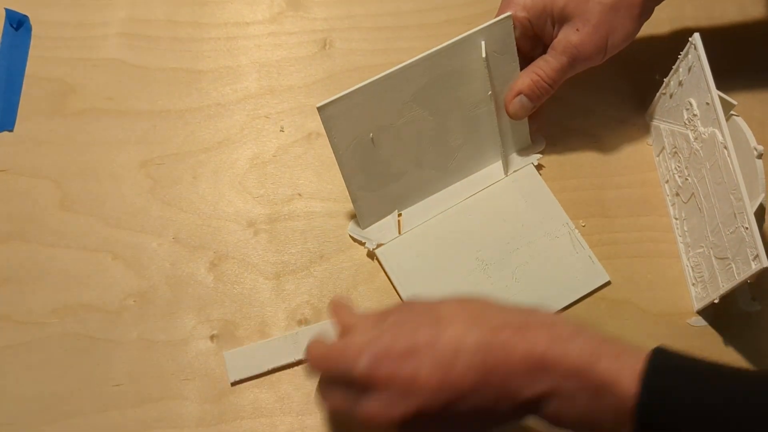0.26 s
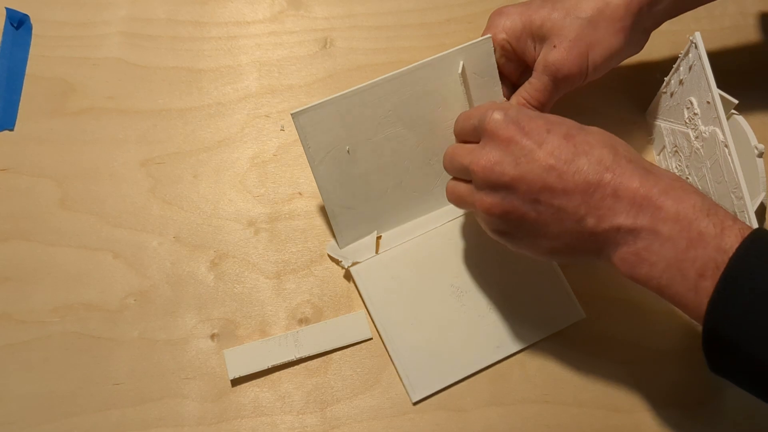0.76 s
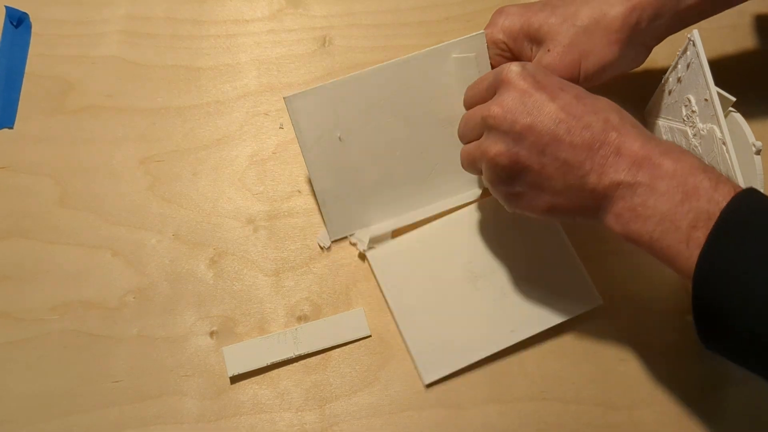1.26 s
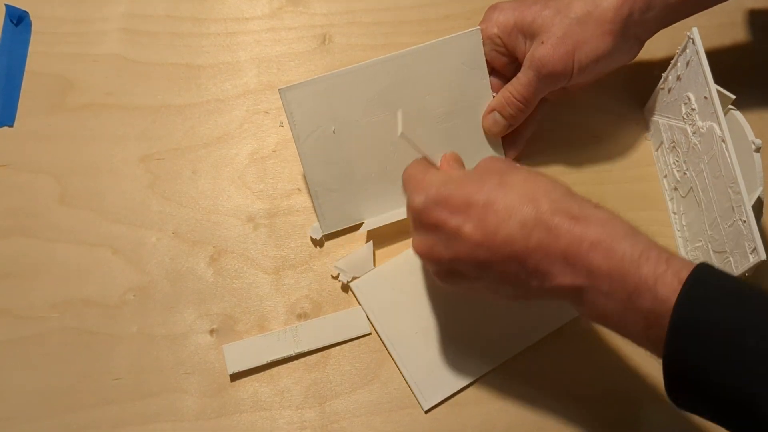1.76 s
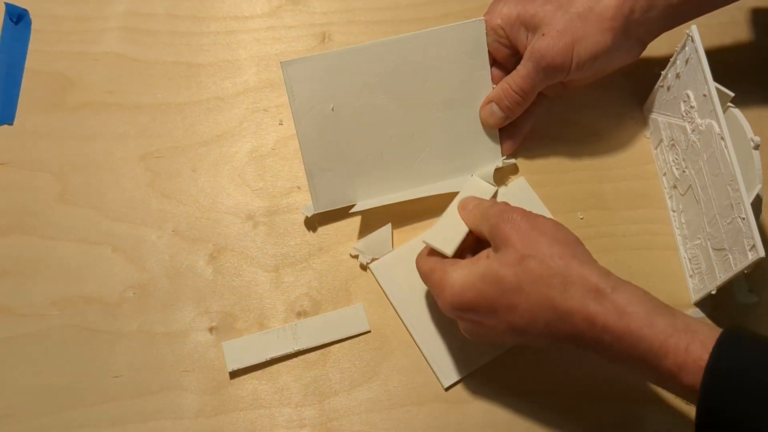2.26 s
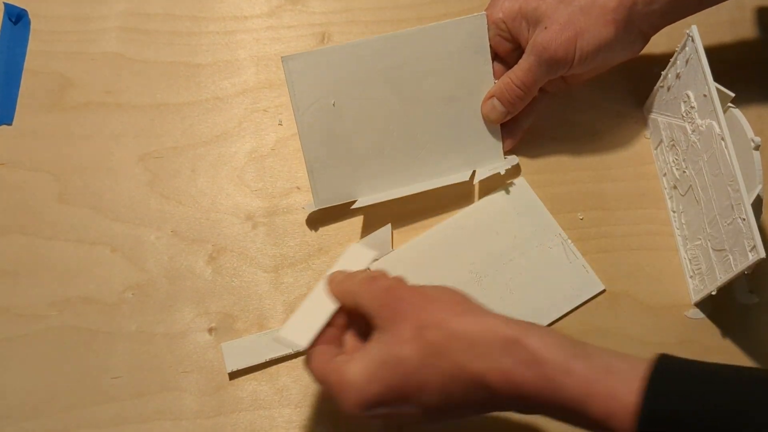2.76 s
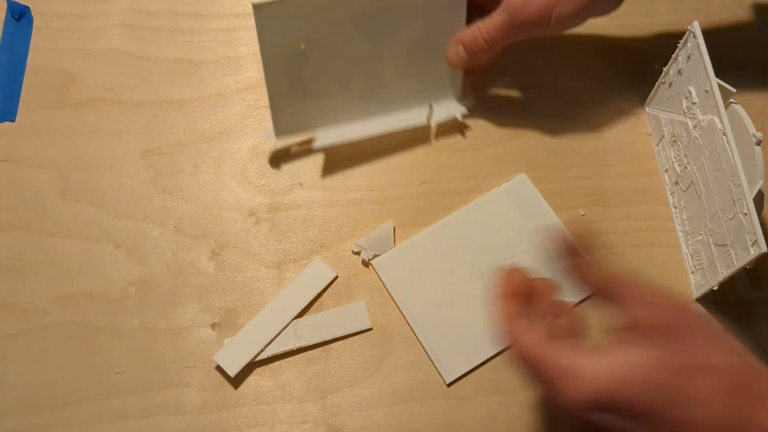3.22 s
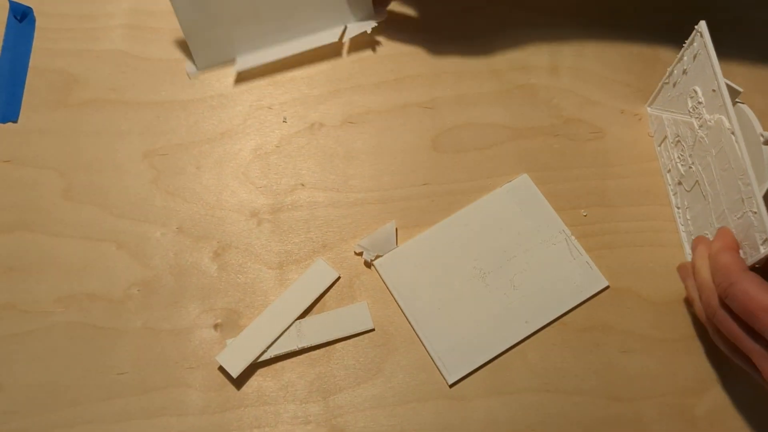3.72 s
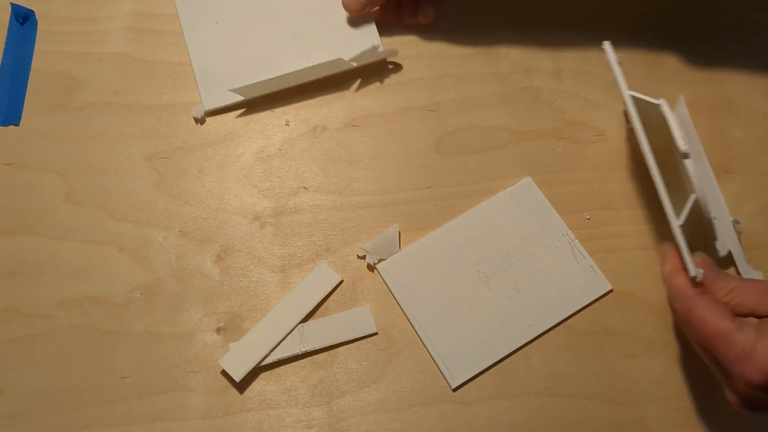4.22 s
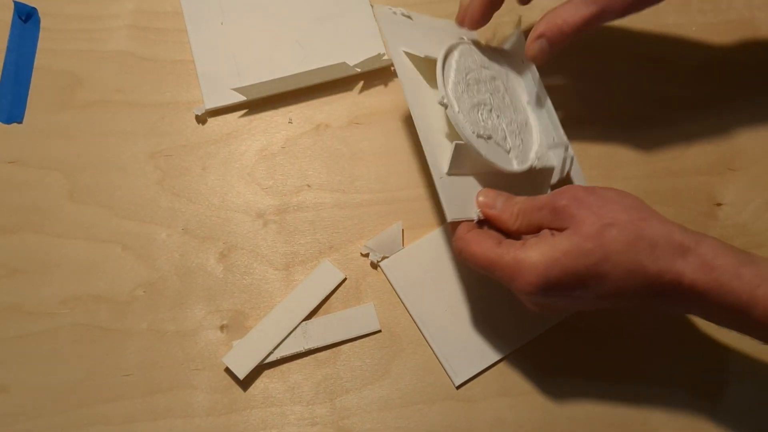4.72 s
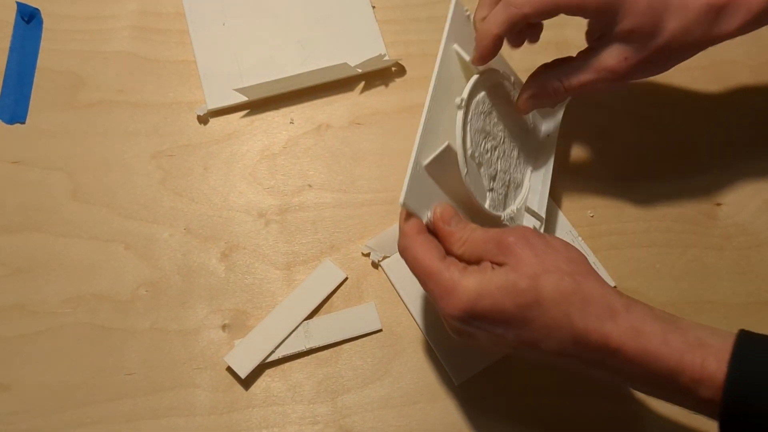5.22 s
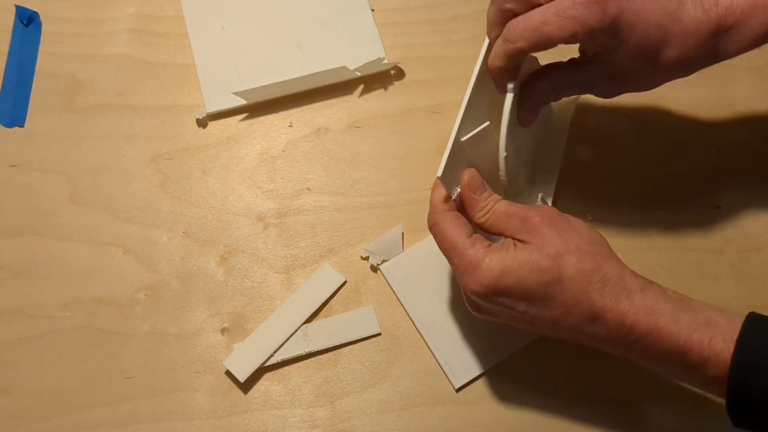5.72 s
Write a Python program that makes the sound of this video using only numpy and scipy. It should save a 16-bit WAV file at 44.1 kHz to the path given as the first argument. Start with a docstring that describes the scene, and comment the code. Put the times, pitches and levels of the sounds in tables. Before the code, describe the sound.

Thin plastic support bars tick and snap off a printed plate with a sharp cracking burst, then pieces clatter, knock and judder on a wooden table.

```python
"""Hands break plastic support bars off printed parts on a wooden table in a small room.
First a loose bar ticks; light blows fall on a plate, then it tears from its base in a run of cracks and clatters;
another bar is pried away and laid down; a dull knock on the table follows; last, a ribbed housing is lifted,
turned, and judders. Blows are noise bursts over damped modes, scrapes and rubbing fingers are random clicks shaped
by spectra, and low noise rumbles and booms as the arms lean on and shove the table, most of it in the first half."""
import sys
import numpy as np
from scipy import signal
from scipy.fft import rfft, irfft, next_fast_len
from scipy.io import wavfile
from scipy.ndimage import uniform_filter1d

SR = 44100
rng = np.random.default_rng(int(sys.argv[2]) if len(sys.argv) > 2 else 0)


def transcribe(signal):
    """Save signal, clipped to [-1, 1], as a 16-bit WAV file at the path in sys.argv[1]."""
    frames = np.atleast_2d(signal).T
    limited = np.clip(frames, -1, 1)
    pcm = np.round(limited * 32767).astype(np.int16)
    wavfile.write(sys.argv[1], SR, pcm)


N = 263718  # length in samples

# Modes each part rings with: (frequency [Hz], relative level [dB], decay by 60 dB [s])
PLATE_MODES = [(862, -13, 0.24), (1130, -10, 0.083), (1260, -12, 0.054), (1536, -4, 0.078),
               (1816, 2, 0.036), (2095, 0.5, 0.098), (2111, -6.5, 0.11), (2497, -2, 0.066),
               (2670, -11, 0.031)]
BAR_MODES = [(906, -4, 0.07), (1131, -4, 0.054), (1988, -3.5, 0.088), (2124, 5.5, 0.023), (2464, -5, 0.11),
             (2732, -8.5, 0.13), (3116, -2.5, 0.099), (3760, -12, 0.14), (4450, -16, .08)]
HOUSING_MODES = [(892, -9, 0.097), (1137, -7, 0.12), (1355, -6, 0.14), (1693, -0.5, 0.07),
                 (1793, -4.5, 0.069), (2461, 5, 0.058), (2577, -2, 0.058), (2800, -3, 0.046),
                 (3028, -7, 0.061), (3320, -5, 0.062), (3950, -5.5, .05), (5560, -11, 0.045)]
# Stick and slip of a stroke: (frequency [Hz], relative level [dB])
RASP = [(100, -30), (350, -18.5), (650, -19.5), (850, -6), (1400, -1), (2200, -1), (2800, -5), (3500, -7),
        (5000, -14), (7000, -25)]
# Skin and edges on the print's ridges: (frequency [Hz], relative level [dB])
FIZZ = [(3500, -30.5), (5000, -8), (7000, -2.5), (9000, -6), (12000, -1.5), (14000, -9), (16000, -11)]


def amp(db):
    """Decibels to gain."""
    return 10 ** (np.asarray(db) / 20)


def read(points, hz):
    """A table's value on a log-frequency axis."""
    f, value = np.transpose(points)
    return np.interp(np.log(hz + 1), np.log(f + 1), value)


def evened(x):
    """Scales to an rms of one."""
    return x / np.sqrt(np.mean(x ** 2) + 1e-20)


def peaked(x, size=130):
    """Scales so that the loudest three milliseconds have an rms of one."""
    power = uniform_filter1d((x ** 2).mean(0), size, mode="constant")
    return x / np.sqrt(power.max() + 1e-20)


def add(mix, s, sound):
    """Mixes a sound in at time s."""
    part = mix[:, max(round(s * SR), 0):][:, :sound.shape[1]]
    part += sound[:, :part.shape[1]]


def paired(z, hz):
    """Two unrelated spectra become a microphone pair, alike in the bass."""
    # Likeness of the two channels: (frequency [Hz], left-right correlation [-1 to 1])
    likeness = [(100, .99), (350, .96), (800, .72), (2000, .68), (4000, .42), (12000, .3)]
    same = np.clip(read(likeness, hz), -1, 1)
    mid = z[0] * np.sqrt((1 + same) / 2)
    side = z[1] * np.sqrt((1 - same) / 2)
    return np.array([mid + side, mid - side])


def favoured(hz, centre_hz, lift_db=6, octaves=0.31):
    """The spot of contact lifts the modes near one frequency, in dB; less so among the crowded treble modes."""
    distance = np.log2((hz + 1) / centre_hz) / octaves
    return lift_db / (1 + (centre_hz / 9000) ** 2) * np.exp(-distance ** 2)


def coloured(x, spectrum, centre_hz=None):
    """Gives two noise channels a spectrum, with a favoured frequency if there is one; rms one."""
    size = next_fast_len(x.shape[1])
    hz = np.fft.rfftfreq(size, 1 / SR)
    skirt = 1 / (1 + (hz / spectrum[-1][0] / 2) ** 4)  # fades out above the table's last frequency
    db = read(spectrum, hz) + (favoured(hz, centre_hz) if centre_hz else 0)
    shaped = paired(rfft(x, size), hz) * amp(db) * skirt
    return evened(irfft(shaped, size)[:, :x.shape[1]])


def noise(spectrum, size, centre_hz=None):
    """Smooth stereo noise of a given spectrum."""
    return coloured(rng.standard_normal((2, size)), spectrum, centre_hz)


def grit(spectrum, size, per_s, spread_db, centre_hz=None, smooth=0.18):
    """Tiny slips and fractures along the print's ridges: random clicks of uneven strength over faint noise."""
    strength = amp(spread_db * np.minimum(rng.exponential(1, size), 4))
    slips = (rng.random(size) < per_s / SR) * strength
    return coloured((slips + smooth) * rng.standard_normal((2, size)), spectrum, centre_hz)


def burst(t, rise, fall):
    """A burst's envelope: short rise, then exponential decay."""
    return (1 - np.exp(-t / rise)) * np.exp(-t / max(fall, .0007))


def ring(modes, centre_hz, size=5120):
    """Damped modes; every blow lands on another spot and weights them anew."""
    t = np.arange(size) / SR
    hz, db, t60 = np.transpose(modes)[:, :, None]
    weight, detune, turn, aside = rng.standard_normal((4, len(modes), 1))
    phase = 2 * np.pi * (hz * (1 + 0.001 * detune) * t + turn)
    height = amp(db + 1.1 * weight + favoured(hz, centre_hz)) * np.exp(-np.log(1000) * t / t60)
    # opposite phase shifts spread each mode between left and right
    pair = [(height * np.sin(phase + way * 0.48 * aside)).sum(0) for way in (-1, 1)]
    return np.array(pair) * (1 - np.exp(-t / 0.00042))


def from_the_left(x, count=2):
    """The sound reaches the right port a few samples after the left."""
    return np.array([x[0], np.pad(x[1], (count, 0))[:N]])


def still_room():
    """The steady, faint noise of the room at rest."""
    # Noise floor: (frequency [Hz], relative level [dB])
    floor = [(15, -42), (25, -4.5), (123, 6.5), (249, -7), (610, -17), (765, 2.5), (988, -19.5), (1130, -2),
             (1560, -12), (2050, -10.5), (4610, -16), (5570, -24.5), (11300, -22.5), (12900, -26.5),
             (16000, -48.5)]
    return amp(-70) * noise(floor, N)


def room(x, build=0.0033):
    """Reflections of a small hard room, fed by the left channel, each band dying at its own speed."""
    # Reverberation: (frequency [Hz], decay by 60 dB [s])
    room_t60 = [(120, 0.22), (500, 0.67), (1000, 0.39), (2000, 0.62), (4000, 0.44), (8000, 0.33),
                (15000, 0.4)]
    # Colour of the reflections: (frequency [Hz], level before the walls' overall gain [dB])
    room_db = [(120, -3), (500, -1.5), (1000, -4), (2000, -12), (5000, -6), (14000, -15)]
    hz, t, z = signal.stft(rng.standard_normal((2, SR)), SR, nperseg=256)
    fall = np.log(1000) / np.maximum(read(room_t60, hz), .05)[:, None]
    z = z * np.exp(-fall * t) * np.sqrt(2 * fall / SR) * amp(read(room_db, hz))[:, None]
    tail = signal.istft(z, SR, nperseg=256)[1][:, :SR]
    tail = irfft(paired(rfft(tail), np.fft.rfftfreq(SR, 1 / SR)), SR)
    tail *= 1 - np.exp(-np.arange(SR) / SR / build)
    return signal.fftconvolve(x[:1], tail, axes=1)[:, :N]


def rumble():
    """The table top rumbles under resting arms and booms briefly at each shove."""
    # An arm shoves the table top: (time [s], deep level [dB], boom level [dB])
    shoves = [(0.0, -53.5, -46.5), (2.13, -57.5, -49.5), (2.29, -59.5, -65.5), (2.441, -63, -68),
              (2.6, -62.5, -70), (5.67, -69, -66.5)]
    # Slow give of the table: (frequency [Hz], relative level [dB])
    deep_spectrum = [(20, -13.5), (35, -4.5), (52, 23), (90, -35), (150, -15), (400, -45.5), (1000, -79)]
    # Boom of the table top: (frequency [Hz], relative level [dB])
    boom_spectrum = [(60, -41), (130, 3.5), (220, -6), (340, -9), (480, -20.5), (900, -42), (2000, -70.5)]
    rise_s, deep_fall_s, boom_fall_s = 0.038, .13, 0.071
    lean_until_s, lean_db = 2.7, -76  # the arms rest on the table until then
    clock = np.arange(N) / SR
    deep = amp(lean_db) * np.exp(-np.maximum(clock - lean_until_s, 0) / deep_fall_s)
    boom = 0
    for s, deep_db, boom_db in shoves:
        t = np.maximum(clock - s, 0)
        push = np.minimum(t / rise_s, 1)
        after = np.maximum(t - rise_s, 0)
        deep = np.hypot(deep, amp(deep_db) * push * np.exp(-after / deep_fall_s))
        boom = np.hypot(boom, amp(boom_db) * push * np.exp(-after / boom_fall_s))
    return deep * noise(deep_spectrum, N) + boom * noise(boom_spectrum, N)


def handling(waver_db=2.5, ring_db=-3):
    """Fingers rub the parts with an unsteady grip; first the plate sings under them, later the housing."""
    # Fingers slide to a new grip: (start [s], length [s], rasp level [dB], fizz level [dB])
    rubs = [(0.129, .34, -61.5, -68), (0.568, 0.19, -65.5, -74.5), (0.946, 0.18, -68, -77),
            (1.441, .26, -62, -75.5), (1.944, 0.22, -59.5, -70.5), (2.38, .1, -54.5, -60),
            (3.645, 0.28, -60.5, -68.5), (3.998, 0.36, -65.5, -71), (4.85, 0.11, -59.5, -71),
            (5.387, .16, -62, -82), (5.7, 0.31, -70.5, -89)]
    grip_s, let_go_s = 0.037, 0.055  # swell and decay of a rub
    t = np.arange(N) / SR
    rasp, fizz = amp(-80), amp(-85.5)  # fingers merely holding a part
    for s, length, rasp_db, fizz_db in rubs:
        slide = np.clip((t - s) / grip_s, 0, 1) * np.exp(-np.maximum(t - s - length, 0) / let_go_s)
        rasp = rasp + amp(rasp_db) * slide
        fizz = fizz + amp(fizz_db) * slide
    slow = uniform_filter1d(uniform_filter1d(rng.standard_normal(N), size=700), size=300)
    grip_db = waver_db * evened(slow)
    slips = grit(RASP, N, 800, 1.9)
    plate = evened(signal.oaconvolve(slips, ring(PLATE_MODES, 1700), axes=1)[:, :N])
    housing = evened(signal.oaconvolve(slips, ring(HOUSING_MODES, 1250), axes=1)[:, :N])
    sung = np.where(t < 3.5, plate, housing)
    rubbed = rasp * evened(slips + amp(ring_db) * sung)
    return amp(grip_db) * (rubbed + fizz * grit(FIZZ, N, 3000, 1.4))


def in_hand(s):
    """The modes of the part being worked at time s."""
    if s < 1.9:
        return PLATE_MODES
    return BAR_MODES if s < 3.5 else HOUSING_MODES


def scrapes(ring_db=-1, size=4096):
    """Short strokes of stick and slip that bite quickly, ease off and set the part ringing."""
    # Plastic on plastic or wood:
    # (start [s], length [s], rasp level [dB], favoured frequency [Hz], fizz level [dB])
    strokes = [(0.455, 0.092, -55, 1850, -75), (0.705, 0.038, -53.5, 1900, -74),
               (.825, 0.056, -51, 1680, -75), (1.335, .04, -32.5, 1890, -49),
               (1.546, 0.047, -52.5, 2400, -69), (1.641, 0.054, -55, 2150, -85),
               (2.021, 0.084, -49.5, 2210, -69), (2.272, 0.03, -45.5, 2050, -77),
               (2.382, 0.026, -42.5, 2200, -47.5), (2.921, 0.066, -60.5, 1950, -75),
               (3.052, 0.078, -53, 1600, -70), (3.415, 0.034, -65, 1700, -84),
               (3.772, 0.036, -55, 2510, -58), (3.839, 0.09, -52, 2400, -71),
               (4.015, .05, -54.5, 1700, -61.5), (4.108, 0.018, -56.5, 2030, -64),
               (4.723, .018, -46, 2300, -57.5), (4.757, 0.069, -49.5, 2200, -64),
               (5.083, .07, -59, 2400, -79), (5.184, 0.03, -59, 2390, -67.5),
               (5.262, 0.022, -48.5, 1114, -60.5), (5.633, 0.048, -54, 2490, -66)]
    out = np.zeros((2, N))
    for s, length, rasp_db, centre_hz, fizz_db in strokes:
        progress = np.linspace(0, 1, int(abs(length) * SR) + 2)
        stroke = np.sqrt(np.abs(np.sin(np.pi * progress ** 0.78)))
        stroke = np.pad(stroke, (0, size))  # room for the ringing
        slips = stroke * grit(RASP, len(stroke), 900, 2.8)
        sung = signal.fftconvolve(slips, ring(in_hand(s), centre_hz), axes=1)[:, :len(stroke)]
        rasp = evened(evened(slips) + amp(ring_db) * evened(sung)) * slips.std()
        fizz = stroke * grit(FIZZ, len(stroke), 1800, 2.4)
        add(out, s, amp(rasp_db) * rasp + amp(fizz_db) * fizz)
    return out


def bumps(size=16384):
    """The table top gives under a part's weight and booms."""
    # A part lands: (time [s], level [dB])
    landings = [(1.295, -55.5), (3.636, -67), (4.296, -49)]
    # Boom under the weight: (frequency [Hz], relative level [dB])
    bump_spectrum = [(35, -28), (70, -11.5), (130, -2), (175, -3.5), (250, -23.5), (600, -49.5)]
    out, t = np.zeros((2, N)), np.arange(size) / SR
    for s, db in landings:
        add(out, s, amp(db) * peaked(noise(bump_spectrum, size) * burst(t, 0.0027, 0.027)))
    return out


def blows(hits, modes, body, ring_db, edge_db, thud_db, crack_hz, crack_share, size=5120):
    """Each blow clacks, rings and cracks; the edge's tick and the table's thud follow from clack and crack."""
    # A stiff edge being hit: (frequency [Hz], relative level [dB])
    edge_spectrum = [(2200, -27.5), (3200, -4.5), (3900, -0.5), (4800, -2), (5700, -9.5), (7500, -23)]
    # Brittle contact: (frequency [Hz], relative level [dB])
    crack_spectrum = [(3500, -33), (5000, -11.5), (6200, -1.5), (8000, -1), (10000, -1.5), (12000, 2.2),
                      (13500, -5), (16000, -18)]
    # Table under a blow: (frequency [Hz], relative level [dB])
    thud_spectrum = [(40, -32), (90, -14), (140, 4), (210, -7), (350, 1.5), (600, -6), (900, -13),
                     (2000, -52)]
    edge_follows = .6  # share of the crack in the tick's level; the clack gives the rest
    thud_follows = 0.72  # dB of thud for each dB of clack
    out, t = np.zeros((2, N)), np.arange(size) / SR
    for s, clack, centre_hz, crack, chatter in hits:
        dense = peaked(noise(body, size, centre_hz) * burst(t, 0.0013, chatter))
        ringing = amp(ring_db) * peaked(ring(modes, centre_hz))
        tick = peaked(noise(edge_spectrum, size) * burst(t, 0.00079, chatter))
        snap = grit(crack_spectrum, size, 3000, 2.5, crack_hz)
        snap = peaked(snap * burst(t, 0.00072, chatter * crack_share))
        thud = peaked(noise(thud_spectrum, size) * burst(t, 0.0024, .012))
        sound = amp(clack) * peaked(dense + ringing)
        sound += amp(clack + edge_follows * (crack - clack) + edge_db) * tick
        sound += amp(crack) * snap
        sound += amp(thud_follows * clack + thud_db) * thud
        add(out, s, sound)
    return out


def table_knock():
    """A dull knock sets the low, short modes of the table top ringing."""
    # (time [s], clack level [dB], favoured frequency [Hz], crack level [dB], chatter time [s])
    table_hits = [(3.632, -32.5, 820, -61, 0.008)]
    # Modes: (frequency [Hz], relative level [dB], decay by 60 dB [s])
    table_modes = [(271, -9.5, 0.13), (471, -9, 0.1), (775, -1, 0.06), (850, -3, 0.06), (1120, -5, 0.065),
                   (1500, -11, 0.08)]
    # Crowd of short modes between them: (frequency [Hz], relative level [dB])
    table_body = [(180, -20), (300, -12), (600, -5), (830, 4.5), (1000, -1), (1200, -1), (2200, -7.5),
                  (3200, -23), (6000, -42)]
    return blows(table_hits, table_modes, table_body,
                 ring_db=-7, edge_db=-13, thud_db=-24.5, crack_hz=12000, crack_share=.8)


def judder(count=8, uneven=.15):
    """A housing edge judders over ribs: a quick run of slips, each a little weaker than the last."""
    # First slip, before its timing wavers:
    # (time [s], clack level [dB], favoured frequency [Hz], crack level [dB], chatter time [s])
    first_slip = (4.772, -31.5, 2700, -37.5, 0.01)
    gap_s, fade_db = .0061, 1.17  # from one slip to the next
    s, clack, centre_hz, crack, chatter = first_slip
    late = uneven * rng.standard_normal(count)
    return [(s + (k + late[k]) * gap_s, clack - k * fade_db, centre_hz, crack - k * fade_db, chatter)
            for k in range(count)]


def housing_blows():
    """The ribbed housing clacks, rings and judders as it is handled."""
    # (time [s], clack level [dB], favoured frequency [Hz], crack level [dB], chatter time [s])
    housing_hits = [(4.259, -31, 2300, -49, 0.0016), (4.2945, -17.5, 1740, -44, 0.002),
                    (4.304, -30.5, 2450, -45, 0.003), (4.312, -33, 2600, -49, 0.0043),
                    (4.338, -33, 1645, -58, .003), (4.7285, -32.5, 2480, -57, 0.0049),
                    (5.131, -58.5, 2400, -59, 0.0064), (5.267, -46, 1130, -61, .0093),
                    (5.402, -53, 3060, -84, 0.0034), (5.442, -51, 1310, -82, .0023),
                    (5.558, -51.5, 1700, -58, 0.0015), (5.695, -44.5, 2400, -80, 0.0031),
                    (5.705, -49, 2490, -66.5, 0.0028), (5.798, -36, 2470, -55, 0.0034)]
    # Crowd of short modes: (frequency [Hz], relative level [dB])
    housing_body = [(450, -35), (720, -20), (900, -10), (1250, -5), (1750, 0), (2100, -4), (2600, 1.5),
                    (3400, -8.5), (5000, -31)]
    return blows(housing_hits + judder(), HOUSING_MODES, housing_body,
                 ring_db=-9, edge_db=-4.0, thud_db=-41.5, crack_hz=6760, crack_share=0.85)


def bar_blows():
    """The loose bars click and ring under short blows."""
    # (time [s], clack level [dB], favoured frequency [Hz], crack level [dB], chatter time [s])
    bar_hits = [(0.142, -44, 1210, -59, 0.0035), (0.242, -40.5, 1200, -52, .005),
                (0.288, -41, 1810, -51, 0.0067), (0.333, -45.5, 1120, -59, .0059),
                (2.189, -22.5, 2900, -32, .0053), (2.324, -25.5, 2150, -55, 0.0053),
                (2.376, -36.5, 2390, -44, 0.0075), (2.452, -32, 2200, -33, 0.0049),
                (2.458, -36, 2070, -36.5, 0.0097), (2.548, -29.5, 2464, -31.5, 0.0054),
                (2.921, -48, 900, -60.5, .0054), (3.005, -37.5, 2700, -37.5, 0.0032),
                (3.017, -33, 1880, -27.5, 0.0079)]
    # Crowd of short modes: (frequency [Hz], relative level [dB])
    bar_body = [(450, -38.5), (720, -14), (900, -0.5), (1500, -5), (2300, 0.5), (3100, -5), (3700, -13.5),
                (5000, -32)]
    return blows(bar_hits, BAR_MODES, bar_body,
                 ring_db=-5, edge_db=-3.5, thud_db=-38, crack_hz=9230, crack_share=0.83)


def plate_blows():
    """Light blows on the plate, then it tears from its base crack after crack and clatters."""
    # The tear, and the blows before and after it, both:
    # (time [s], clack level [dB], favoured frequency [Hz], crack level [dB], chatter time [s])
    tear = [(1.2603, -34, 1988, -52, 0.0033), (1.2632, -25, 2664, -37.5, 0.0037),
            (1.2648, -18.5, 1490, -40, 0.0012), (1.2694, -21, 1710, -31, .0034),
            (1.2712, -21.5, 2300, -20.5, 0.0028), (1.2752, -17.5, 2100, -25.5, 0.0029),
            (1.2812, -23.5, 1001, -31, 0.012)]
    plate_hits = [(0.624, -50, 1360, -60.5, .0076), (0.814, -45, 1540, -65, 0.0037),
                  (0.928, -55, 1820, -67, 0.021), (1.0, -40.5, 1820, -55.5, 0.0096),
                  (1.041, -53, 1520, -71, .005), (1.205, -38.5, 1710, -76, 0.0061),
                  (1.288, -23.5, 2606, -31.5, 0.011), (1.296, -24.5, 1540, -42.5, 0.0031),
                  (1.311, -25, 2040, -31, 0.0046), (1.32, -22, 1790, -43, .0081),
                  (1.379, -28.5, 2040, -45, 0.0027), (1.383, -24.5, 2140, -51, .006),
                  (1.533, -39.5, 2060, -63, .0062), (1.564, -52, 2400, -56.5, .003),
                  (1.637, -47, 2000, -80, 0.0068), (1.694, -46, 2040, -84, .005),
                  (1.771, -54, 2420, -65.5, .005)]
    # Crowd of short modes: (frequency [Hz], relative level [dB])
    plate_body = [(450, -33.5), (700, -15.5), (860, -6.5), (1400, 0.5), (2100, 3.5), (2700, 1),
                  (3400, -10.5), (5000, -35)]
    torn = blows(tear, PLATE_MODES, plate_body,
                 ring_db=-9, edge_db=-3.5, thud_db=-30, crack_hz=9010, crack_share=1.2)
    return torn + blows(plate_hits, PLATE_MODES, plate_body,
                        ring_db=-5, edge_db=-2.5, thud_db=-33, crack_hz=9000, crack_share=0.93)


def plastic(bars_db=0, housing_db=0):
    """Every blow and stroke, as radiated in one direction; the housing is held nearer the middle."""
    bars = amp(bars_db) * bar_blows()
    housing = amp(housing_db) * housing_blows()
    others = plate_blows() + bars + table_knock() + scrapes() + bumps()
    return from_the_left(others, count=3) + from_the_left(housing, count=2)


def scene(walls_db=-3.0):
    """Direct sound and room; the walls are also fed by what the parts radiate away from the microphone."""
    near = plastic() + from_the_left(handling(), count=3)
    away = plastic(bars_db=-2, housing_db=-7)
    walls = amp(walls_db) * (room(near) + room(away))
    return near + walls + rumble() + still_room()


def record(dry, low_cut_hz=36, edge_hz=16300):
    """The two microphone ports differ in colour and shed the deepest bass; then the band limit."""
    # Colour of the ports: (frequency [Hz], left minus right level [dB])
    balance_db = [(200, 1), (2200, -1.7), (5000, 1), (7000, 5.5), (9000, 5.5), (11000, 2), (13000, -3.5),
                  (16000, 5.5)]
    size = next_fast_len(N + SR)
    lean_db = read(balance_db, np.fft.rfftfreq(size, 1 / SR)) / 2  # half to each side
    heard = irfft(rfft(dry, size) * amp([lean_db, -lean_db]), size)[:, :N]
    low_cut = signal.butter(4, low_cut_hz, "highpass", fs=SR, output="sos")
    heard = signal.sosfilt(low_cut, heard)
    band_limit = signal.firwin(511, edge_hz, window=("kaiser", 9), fs=SR)
    return signal.oaconvolve(heard, band_limit[None], "same")


dry = scene()
out = record(dry)
transcribe(out)
```